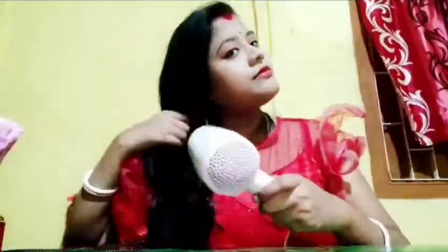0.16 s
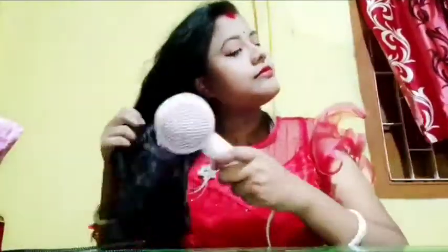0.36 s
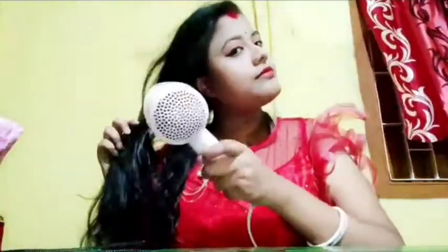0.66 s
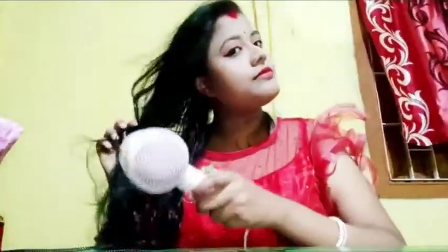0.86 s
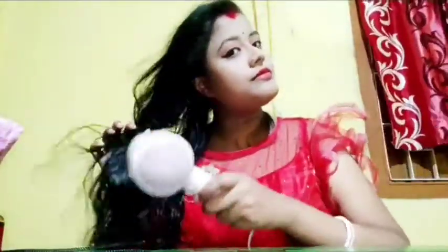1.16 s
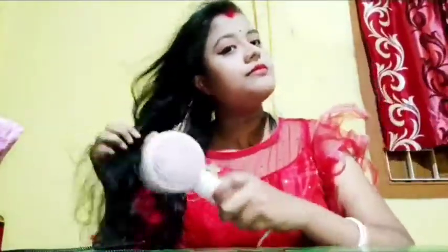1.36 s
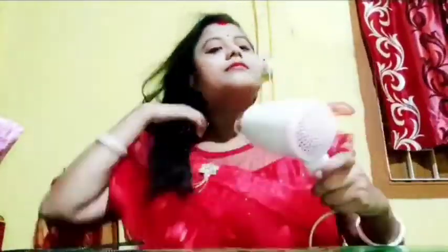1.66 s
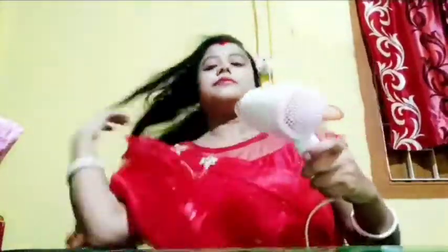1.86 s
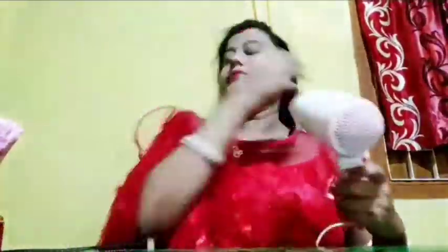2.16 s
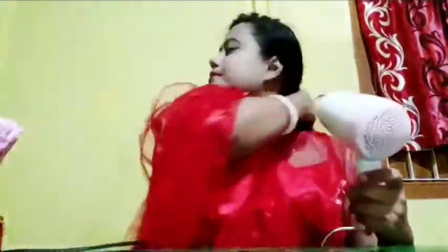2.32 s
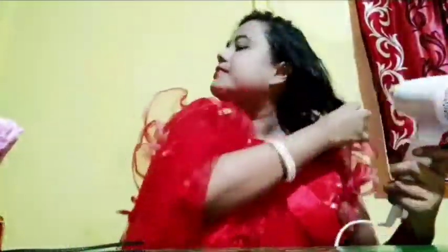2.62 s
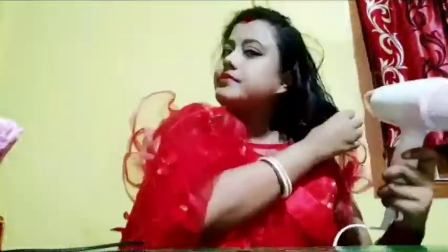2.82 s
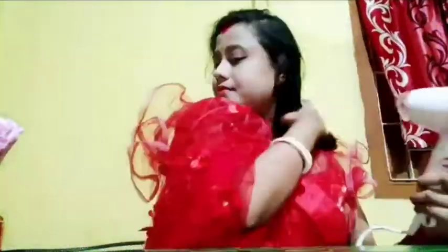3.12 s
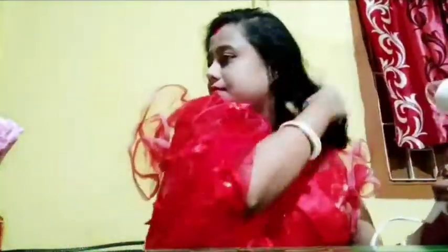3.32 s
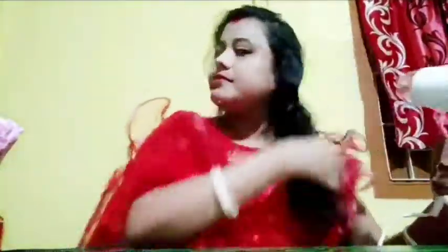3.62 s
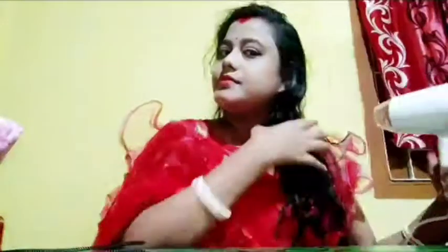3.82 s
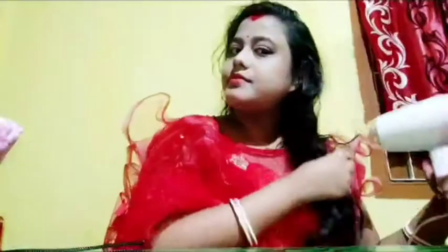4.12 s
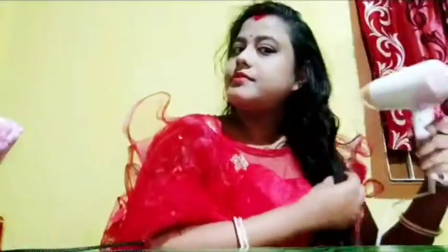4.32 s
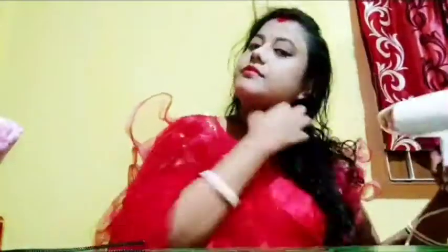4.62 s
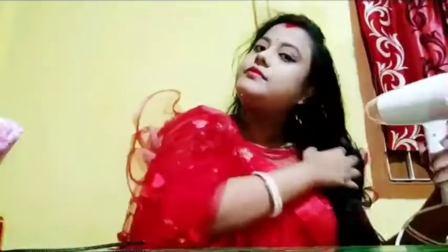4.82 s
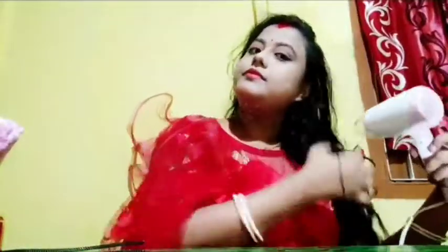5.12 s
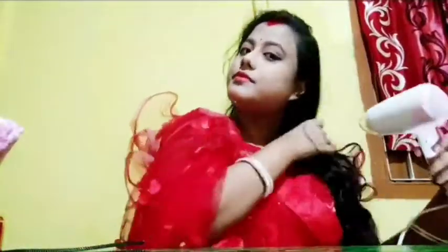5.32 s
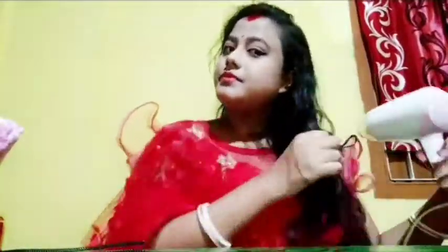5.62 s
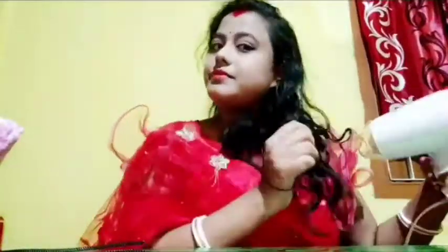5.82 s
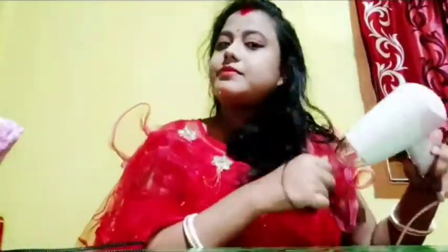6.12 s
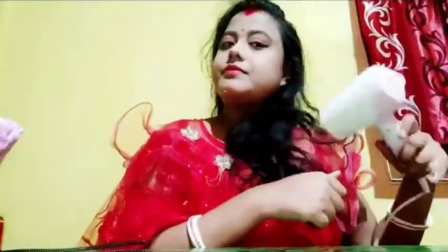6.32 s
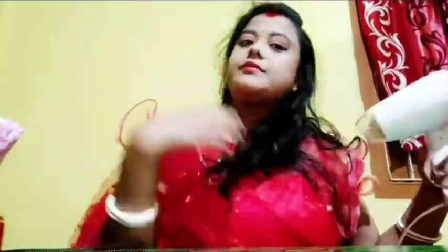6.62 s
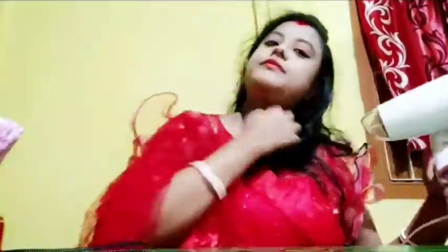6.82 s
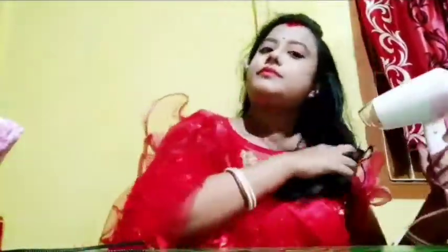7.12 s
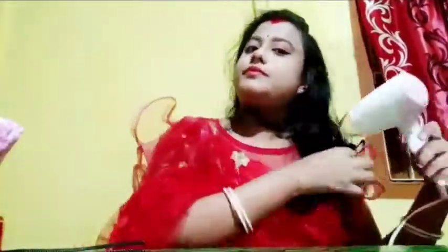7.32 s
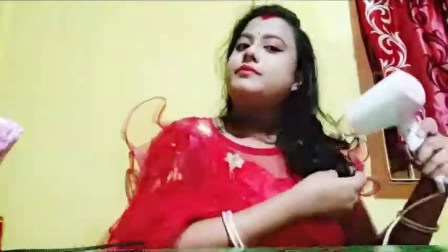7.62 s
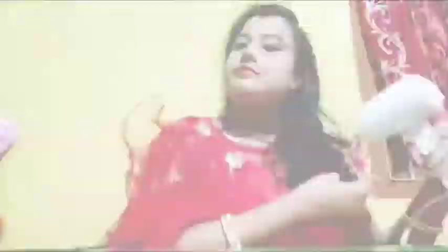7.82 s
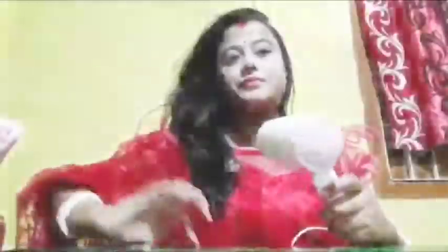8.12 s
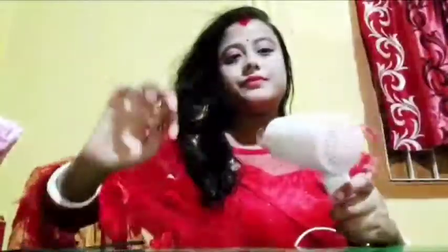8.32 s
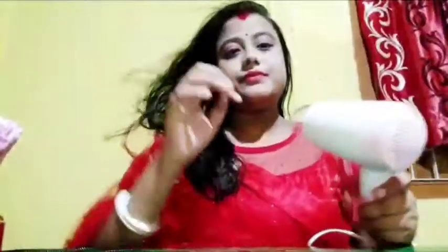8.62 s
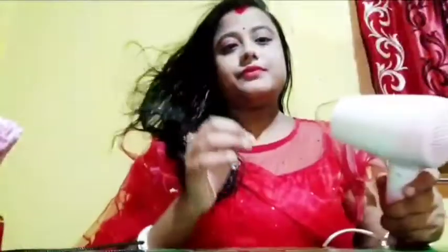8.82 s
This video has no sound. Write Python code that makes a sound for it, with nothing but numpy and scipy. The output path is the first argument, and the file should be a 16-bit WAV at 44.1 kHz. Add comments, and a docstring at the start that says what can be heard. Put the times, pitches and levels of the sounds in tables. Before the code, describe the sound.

Close, continuous hair dryer noise: rushing air, a rough mid-pitched whistle and fan whine, shifting as it is waved, with one quick fade out and in.

```python
"""In a room, a hand-held hair dryer runs at steady speed, waved about a head near a phone with two microphone ports.
The barrel is a shaken whistle in roaring noise; the fan blades add a second shaken tone with noise humps above it.
The intake grille is shaped noise, brighter as it faces the phone, with short echoes; a jet and draughts lie below.
The sound fades to near silence and up again, and the dryer is then held elsewhere."""
import sys
import numpy as np
from scipy import signal
from scipy.fft import rfft, irfft
from scipy.io import wavfile
from scipy.ndimage import uniform_filter1d, map_coordinates

SR = 44100
rng = np.random.default_rng(int(sys.argv[2]) if len(sys.argv) > 2 else 0)


def put_to_file(sound):
    """Save the sound as 16-bit audio at rate SR, in the file named by the first command-line argument."""
    columns = np.atleast_2d(sound).T  # one column per channel
    safe = np.clip(columns, -1, 1)
    whole_steps = np.round(safe * 32767)
    wavfile.write(sys.argv[1], SR, whole_steps.astype(np.int16))


N = 395118


def undb(db):
    """Turn decibels into an amplitude factor."""
    return 10 ** (np.asarray(db) / 20)


def unit(x):
    """Scale a signal to an rms of one."""
    return x / np.sqrt(np.mean(np.abs(x) ** 2))


def pan(db):
    """Gains for the two ports, from left minus right in dB."""
    return undb(np.array([db, -db]) / 2)


def along(table):
    """Read a (Hz, value) table at every bin of the spectrum, along log frequency."""
    hz, value = np.transpose(table)
    bins_hz = np.maximum(np.fft.rfftfreq(N, 1 / SR), 1)
    return np.interp(np.log(bins_hz), np.log(hz), value)


def curves(table):
    """Draw straight lines in time through each column of a table that starts with seconds."""
    s, *columns = np.transpose(table)
    return [np.interp(np.arange(N) / SR, s, c) for c in columns]


def walk(rate):
    """Random levels of unit rms, held 1 / rate s and slewed twice."""
    k = int(SR / rate)
    steps = np.repeat(rng.standard_normal(N // k + 1), k)
    slewed = uniform_filter1d(uniform_filter1d(steps, k), k)
    return unit(slewed[:N])


def late(x, ms):
    """Read a sound a moving number of milliseconds late."""
    return map_coordinates(x, [np.arange(N) - ms * SR / 1000], order=3, mode="mirror")


def ports(x, lead_ms):
    """One source reaches the two ports a little apart."""
    return np.array([late(x, -lead_ms / 2), late(x, lead_ms / 2)])


def heard(parts, lead_ms):
    """The direct part with the lag of its direction, plus the walls."""
    return ports(parts[0], lead_ms) + parts[1:]


# How much of a noise comes back off the walls. Each row: frequency in Hz, share of the power (0-1).
WALL_SHARE = [(100, 0.012), (600, 0.08), (1200, 0.24), (1850, 0.33), (2300, 0.33), (2750, 0.09),
              (3500, 0.08), (3950, 0.35), (4600, 0.9), (10000, 0.8)]


def air(colour, db, flicker_db, rate):
    """Turbulent noise: a direct part, and a part from the walls that is unrelated at each port."""
    gain, wet = undb(along(colour)), np.clip(along(WALL_SHARE), 0, 1)
    share = np.sqrt([1 - wet, wet, wet])
    parts = irfft(rfft(rng.standard_normal((3, N))) * gain * share, N)
    parts = parts / np.sqrt(np.mean(parts[0] ** 2 + parts[1] ** 2))
    return parts * undb(db + flicker_db * walk(rate))


SKIRT_HZ = 156


def tone(hz, width_hz, steady, wander_hz):
    """A self-sustained tone shaken by turbulence: a turning pointer, part steady and part noise in its resonance."""
    shake = rng.standard_normal(N) + 1j * rng.standard_normal(N)
    for band_hz in (width_hz, SKIRT_HZ):  # the second, wide pole keeps the far skirts dark
        pole = np.exp(-np.pi * band_hz / SR)
        shake = signal.lfilter([1 - pole], [1, -pole], shake)
    phase = 2 * np.pi * np.cumsum(hz + wander_hz * walk(160)) / SR
    pointer = np.sqrt(steady) + np.sqrt(1 - steady) * unit(shake)
    return unit((pointer * np.exp(1j * phase)).real), phase


# How the dryer is held. Each row: start in seconds, time by which the left port leads in ms,
# grille high hiss in dB, gain of the low and high hiss off the walls in dB,
# blade whine in dB, whine panning as left minus right in dB.
HOLD = [(0, -0.068, -26.5, -4, -37, 16), (.19, -0.069, -26, -3.5, -36.5, 15),
        (.4, -0.093, -29, -0.5, -39.5, 12), (.62, -0.17, -25, -5, -33.5, 9),
        (.75, -0.096, -29, -0.5, -39.5, 13), (.91, -0.18, -25, -6, -32, 9),
        (1.06, -0.17, -27.5, -2.5, -43, 6), (1.2, -0.17, -26, -3.5, -37.5, 11),
        (1.35, -0.17, -26, -4, -37, 5), (1.47, -0.15, -26, -5.5, -38, 7),
        (1.65, 0.016, -27.5, -2, -35.5, 5), (2.15, 0.076, -30, 0.5, -28.5, -7),
        (2.36, 0.084, -26.5, -2.5, -32, -16), (2.5, 0.12, -28.5, -4, -30, -5),
        (2.65, 0.2, -30, -0.5, -33, 1), (3.05, 0.19, -31.5, -1, -30.5, -1), (3.4, 0.26, -32, -1, -32.5, -6),
        (3.7, 0.26, -33.5, -1, -34, -8), (3.95, 0.21, -35, 0.7, -25, -1), (4.4, 0.2, -34, 0.5, -31.5, -1),
        (4.75, 0.23, -33.5, -2.2, -27.5, -1), (4.95, 0.2, -34.5, 0.5, -30, -3),
        (5.1, 0.19, -34, -1.5, -30, -2), (5.4, 0.18, -34, 0, -28.5, 0), (5.62, 0.19, -33, -1.5, -25.5, -1),
        (5.78, 0.2, -33.5, 0, -29, -1), (6.05, 0.17, -35.5, 2.5, -26.5, 0), (6.4, 0.033, -34, 2, -35, -4),
        (6.62, 0.18, -36, 1.8, -28, -1), (7.0, 0.2, -36.5, 2.5, -29, -1), (7.25, 0.16, -35, 0.8, -31, -3),
        (7.94, 0.21, -36, 0, -31, 1), (7.99, 0.013, -26.5, -6, -32.5, -2),
        (8.55, 0.07, -26.5, -1.5, -31, -14), (8.7, 0.11, -27.5, -1, -29, -14),
        (8.96, 0.18, -26, -5.5, -30.5, -21)]
# Levels of the barrel's whistle and roar, and their panning, over time.
# Each row: start in seconds, whistle in dB, roar in dB, panning as left minus right in dB.
BARREL = [(0, -18.5, -27.5, -8.5), (.35, -20.5, -25, -4), (.7, -17.5, -27.5, -5.5),
          (1.25, -16.5, -27.5, -3.5), (1.75, -20, -25.5, -6), (2.25, -22.5, -26, 5), (2.6, -19, -26.5, 0),
          (3.2, -16.5, -27.5, 1), (3.8, -16.5, -25.5, 2), (4.45, -23, -25.5, 1.5), (4.8, -19, -27, 1.5),
          (5.15, -23.5, -25, 1.7), (5.5, -20.5, -27.5, 1), (6.05, -19, -22, 3.2), (6.4, -20, -24, 4.5),
          (6.75, -16.5, -23.5, 3.5), (7.3, -22.5, -25, 2), (7.94, -20, -24.5, 1.5), (7.99, -21, -29, -8),
          (8.35, -21.5, -26, 0), (8.65, -17, -24, 0), (8.96, -19.5, -20.5, 3.5)]


def dryer():
    """Barrel, blades, grille and jet, each heard as the dryer is turned."""
    lead, high_db, walls_db, blade_db, blade_pan = curves(HOLD)
    whistle_db, roar_db, barrel_pan = curves(BARREL)
    facing_db = high_db - np.mean(high_db)
    barrel_parts, whistle_phase = barrel(whistle_db, roar_db)
    whine, blade_phase = blades(blade_db, blade_pan, lead)
    hiss = grille(high_db, facing_db, walls_db)
    hiss[0] += mixtures(blade_phase, whistle_phase, facing_db)
    sound = heard(barrel_parts, lead) * pan(barrel_pan) + whine
    sound += echo(heard(reflect(hiss), lead))
    sound += heard(narrow_hiss(facing_db), NARROW_LEAD * lead)
    sound += heard(jet(roar_db, facing_db, blade_phase), lead / 2)
    sound += opposed(facing_db)
    return shade(sound, lead)


# Colour of the barrel's roar. Each row: frequency in Hz, relative density in dB per Hz.
ROAR = [(250, -54), (500, -38), (650, -10), (760, 0), (850, -2), (930, 9), (1000, 4), (1150, -0.5),
        (1300, -5), (1450, -17.5), (1650, -10), (1850, -20), (2800, -76)]
WHISTLE_HZ, WHISTLE_WIDTH_HZ, WHISTLE_STEADY, WHISTLE_WANDER_HZ = 868.5, 32, .77, 12.5
WAVER_HZ, WAVERS_PER_S = 4, 9  # the whistle drifts as the jet meets hair


def barrel(whistle_db, roar_db):
    """The barrel's self-sustained whistle stands in the broad roar of its turbulent air."""
    drifting_hz = WHISTLE_HZ + WAVER_HZ * walk(WAVERS_PER_S)
    whistle, phase = tone(drifting_hz, WHISTLE_WIDTH_HZ, WHISTLE_STEADY, WHISTLE_WANDER_HZ)
    parts = air(ROAR, roar_db, 1.0, 27)
    parts[0] += undb(whistle_db) * whistle
    return parts, phase


# Pitch of the blade whine. Each row: start in seconds, frequency in Hz before its wander.
BLADE_HZ = [(0, 1235), (2, 1234), (3.2, 1231), (4.2, 1229), (7.9, 1229), (8, 1234), (8.96, 1234)]
# Noise humps at the blade overtones. Each row: frequency in Hz, relative density in dB per Hz.
BLADE_HUMPS = [(1900, -42), (2200, -18), (2470, 4), (2750, -12), (3350, -22), (3700, 4), (4150, -8),
               (4600, -40)]
BLADE_WIDTH_HZ, BLADE_STEADY, BLADE_WANDER_HZ = 20, .72, 8
HUMPS_DB, HUMPS_FLICKER_DB = -12.5, 1.5  # level relative to the whine
HUMPS_LEAD = 1.65  # the humps reach the two ports farther apart in time than the whine does


def blades(blade_db, blade_pan, lead):
    """The passing blades whine, and turbulence heaps up noise round the overtones."""
    blade, phase = tone(curves(BLADE_HZ)[0], BLADE_WIDTH_HZ, BLADE_STEADY, BLADE_WANDER_HZ)
    whine = ports(undb(blade_db) * blade, lead) * pan(blade_pan)
    humps = air(BLADE_HUMPS, blade_db + HUMPS_DB, HUMPS_FLICKER_DB, 6)
    return whine + heard(humps, HUMPS_LEAD * lead), phase


# Colours of the low, high and top hiss. Each row: frequency in Hz, relative density in dB per Hz.
GRILLE_LOW = [(900, -45), (1600, 2.5), (1900, -2), (2200, 6.5), (2800, 7.5), (3200, 7.5), (3800, -99),
              (6000, -60)]
GRILLE_HIGH = [(1800, -60), (2800, -80), (3300, 5.5), (4200, 4.5), (5600, 1), (6100, -0.5), (7000, -6.5),
               (9000, -7.5), (11000, -13), (15000, -74)]
GRILLE_TOP = [(5000, -55), (8000, -9), (10000, 8), (11200, 8.5), (12500, 3), (15500, -3.5)]
# Straight and wall levels of the low hiss over time. Each row: start in seconds,
# gain of the straight part in dB, gain of the part from the walls in dB before the hold's own wall gain.
LOW_HISS = [(0, -2.5, 0), (.45, -2, -3), (.9, -2.5, -4), (1.45, -2.5, -3), (1.7, -3.5, -2), (2.1, -2.5, 1),
            (2.45, -4.5, 3.5), (2.6, -2, -2), (3.05, -1.5, -4), (3.3, -2.5, -1), (3.8, -6, 0), (4.3, -3, 1),
            (4.8, -3, -3), (5.05, -5, 0.5), (5.5, -1, -3), (5.9, -2, 0), (6.3, -10, 2.5), (6.7, -5, 3),
            (7.3, -5, 3.5), (7.94, -5, 1.5), (7.99, -4.5, 0), (8.4, -4.5, 4), (8.65, 1, -7), (8.96, -2, 1)]
# the low and top hiss follow the grille's turning less than the high hiss does
LOW_HISS_DB, LOW_BEAM, TOP_DB, TOP_BEAM = -28.5, 0.88, -46.5, 0.76
HISS_FLICKER_DB = .9


def grille(high_db, facing_db, walls_db):
    """Air rushing into the intake hisses in three bands that rise as the grille faces the phone."""
    hiss = air(GRILLE_LOW, LOW_HISS_DB + LOW_BEAM * facing_db, HISS_FLICKER_DB, 70)
    straight_db, wall_db = curves(LOW_HISS)
    hiss *= undb([straight_db, wall_db, wall_db])
    hiss += air(GRILLE_HIGH, high_db, HISS_FLICKER_DB, 70)
    hiss[1:] *= undb(walls_db)
    return hiss + air(GRILLE_TOP, TOP_DB + TOP_BEAM * facing_db, 2.9, 24)


# Overtones and mixtures of the two tones. Each row: blade multiple, whistle multiple,
# peak level in dB before turning and flicker.
MIXES = [(1, -1, -51), (2, 0, -51), (4, 0, -48), (5, 0, -59), (2, -1, -48), (3, -1, -44)]
MIX_BEAM, TONE_FLICKER_DB = 1.1, 3


def mixtures(blade_phase, whistle_phase, facing_db):
    """The blades chop the whistling air, so overtones and differences of both tones leave through the grille."""
    total = np.zeros(N)
    for m, n, db in MIXES:
        level = undb(db + MIX_BEAM * facing_db + TONE_FLICKER_DB * walk(25))
        total += level * np.sin(m * blade_phase + n * whistle_phase)
    return total


# How late the head, shoulders and hair return the hiss: a list of delays in ms, before the sway.
REFLECT_MS = [1.308, 2.1, 3.4]
REFLECT_DB, REFLECT_SWAY_MS, REFLECT_SWAYS_PER_S = -9, .1, 8


def reflect(parts):
    """Swaying echoes from the moving body clump the hiss into drifting patches."""
    out = []
    for x in parts:
        returns = sum(late(x, ms + REFLECT_SWAY_MS * walk(REFLECT_SWAYS_PER_S)) for ms in REFLECT_MS)
        out.append(x + undb(REFLECT_DB) * returns)
    return np.array(out) / np.sqrt(1 + len(REFLECT_MS) * undb(2 * REFLECT_DB))  # keep the power


# A near surface returns the grille's hiss. Each row: start in seconds, delay at the left port in ms,
# strength at the left port (0-1) before the power is evened out.
ECHO = [(0, 0.42, 0.36), (.6, 0.47, 0.3), (1.55, 0.4, 0.15), (1.7, 0.8, 0.34), (2.3, 0.66, 0.4),
        (2.7, 0.78, 0), (3.1, 0.31, 0.16), (3.9, 0.35, 0.3), (5.0, 0.34, 0.1), (6.0, 0.35, 0),
        (7.0, 0.29, 0.15), (7.95, 0.31, 0.1), (7.99, 0.79, 0.2), (8.4, 0.72, 0.4), (8.96, 0.74, 0)]
ECHO_RIGHT_LATER_MS, ECHO_RIGHT_SHARE = 0.04, 0.4


def echo(x):
    """The short echo combs the hiss, later and weaker at the right port."""
    ms, left = curves(ECHO)
    strength = np.clip([left, ECHO_RIGHT_SHARE * left], 0, .9)
    returned = np.array([late(x[0], ms), late(x[1], ms + ECHO_RIGHT_LATER_MS)])
    return (x + strength * returned) / np.sqrt(1 + strength ** 2)


# Colour of a band of hiss near 1.9 kHz. Each row: frequency in Hz, relative density in dB per Hz.
NARROW_HISS = [(1400, -23), (1600, -1), (1900, 2.5), (2100, 0.5), (2350, -28.5)]
NARROW_DB, NARROW_BEAM = -40.5, 1.3
NARROW_LEAD = 0.34  # a smaller lag between the ports than the grille's


def narrow_hiss(facing_db):
    """A band of hiss near 1.9 kHz that rises and falls more than the grille's high hiss as the dryer turns."""
    return air(NARROW_HISS, NARROW_DB + NARROW_BEAM * facing_db, 2.7, 12)


# Colours of the jet, and of the hum as the unbalanced shaft shakes the dryer's shell.
# Each row: frequency in Hz, relative density in dB per Hz.
JET = [(30, -48), (115, -32), (140, -19.5), (170, -11.5), (240, -4.5), (300, -4), (420, -1.5), (600, 0),
       (900, -4), (1600, -22.5), (2500, -55)]
HUM = [(190, -30), (225, -6), (245, 0), (265, -6), (310, -30)]
# Level of that hum. Each row: start in seconds, level in dB before flicker.
HUM_DB = [(0, -51), (3.3, -56), (4.2, -55), (7.5, -52.5), (8.96, -52)]
JET_DB = -35.5
BLADES, SHAFT_DB = 5, -56.5  # the shaft hums once a turn


def jet(roar_db, facing_db, blade_phase):
    """The low rush of blown air, with the shaft's tone at one fifth of the blade tone and its noisy hum."""
    turning_db = 0.56 * (roar_db - np.mean(roar_db)) + 0.36 * facing_db
    parts = air(JET, JET_DB + turning_db, 1.0, 8.8)
    shaft_level = undb(SHAFT_DB + TONE_FLICKER_DB * walk(4.1))
    parts[0] += shaft_level * np.sin(blade_phase / BLADES)
    return parts + air(HUM, curves(HUM_DB)[0], 1.0, 3)


# Colour of the rush in opposite phase. Each row: frequency in Hz, relative density in dB per Hz.
OPPOSED = [(1100, -50), (1300, -4), (1450, 0), (1600, -1), (1720, -10), (2000, -50)]
OPPOSED_DB = -40


def opposed(facing_db):
    """A band of the rush that reaches the two ports in opposite phase."""
    rush = air(OPPOSED, OPPOSED_DB + 0.68 * facing_db, .8, 15)[0]
    return rush * np.array([[1], [-1]])


# How the phone's body colours the ports. Each row: frequency in Hz, left minus right in dB.
PORTS = [(3000, 0), (3600, 1), (4300, 3.5), (5300, 3), (6100, -1), (6800, -7.5), (8000, -3.5),
         (10000, -1.5), (15000, -1)]
SHADE_HZ, SHADE_DB_PER_MS = 6160, 1


def shade(x, lead_ms):
    """The left port favours the low treble; the top treble leans to the port that the sound reaches first."""
    high_pass = signal.butter(4, SHADE_HZ, "high", fs=SR, output="sos")
    top = signal.sosfiltfilt(high_pass, x)
    leaning = x + top * (pan(SHADE_DB_PER_MS * lead_ms) - 1)
    return irfft(rfft(leaning) * pan(along(PORTS)), N)


RUMBLE_DB = -64.5


def rumble():
    """Stray draughts on the ports, in gusts, stronger on the right, with a patchy low buffeting."""
    low_pass = signal.butter(2, 38, fs=SR, output="sos")
    low = signal.sosfilt(low_pass, rng.standard_normal((3, N)))
    band = signal.butter(2, [75, 150], "band", fs=SR, output="sos")
    buffet = signal.sosfilt(band, rng.standard_normal((2, N)))
    # one shared draught plus one of its own at each port
    gusts = unit(low[0] + low[1:]) * undb(RUMBLE_DB + 2.0 * walk(7.6)) * pan(np.array([-4.0]))
    patches_db = 7.5 * walk(9) + 2 * walk(30)
    buffeting = unit(buffet[0] + 0.5 * buffet[1] * np.array([[1], [-1]]))
    return gusts + buffeting * undb(RUMBLE_DB - 5.0 + patches_db)


def scene():
    """The dryer over the draughts."""
    return dryer() + rumble()


FADE_CENTRE_S, FADE_S, GAP_S = 7.967, 0.47, 0.008  # the gap reaches this far to each side of the centre
TOP_HZ = 15650


def record(dry):
    """A straight fade down to a brief near silence and up again; a steep low-pass cuts the top."""
    from_centre_s = np.abs(np.arange(N) / SR - FADE_CENTRE_S)
    fade = np.clip((from_centre_s - GAP_S) / FADE_S, .003, 1)
    low_pass = signal.ellip(10, .2, 70, TOP_HZ, fs=SR, output="sos")
    return signal.sosfilt(low_pass, dry * fade)


dry = scene()
out = record(dry)
put_to_file(out)
```